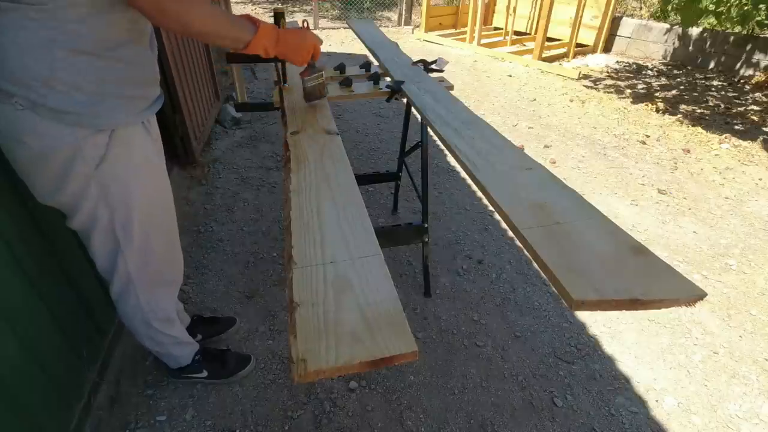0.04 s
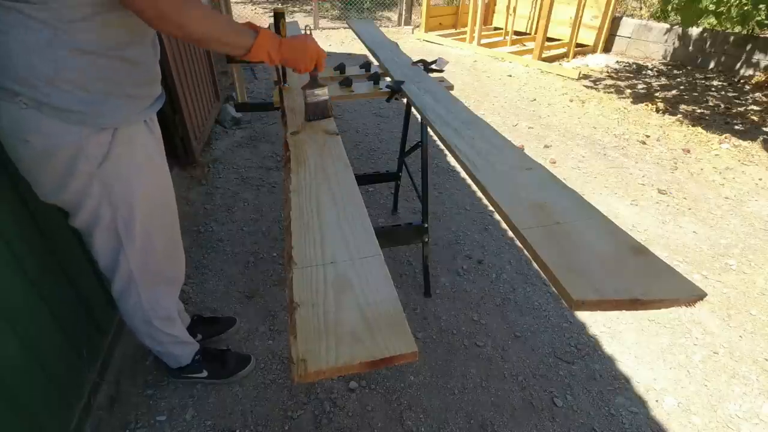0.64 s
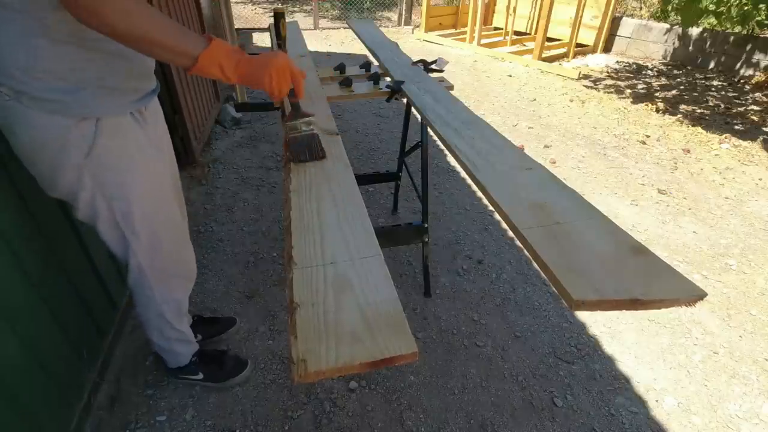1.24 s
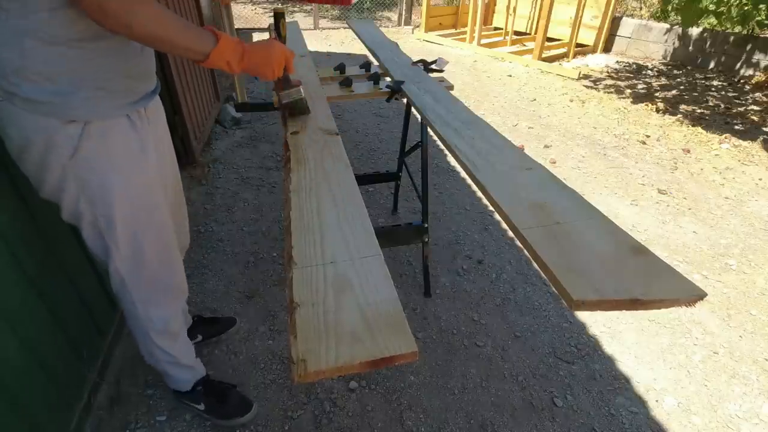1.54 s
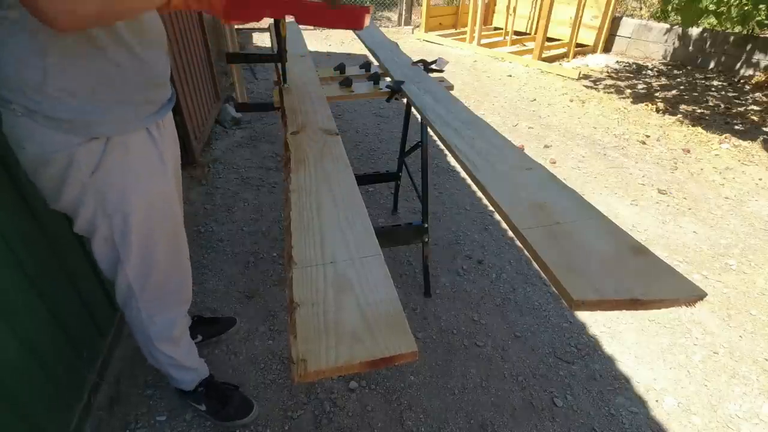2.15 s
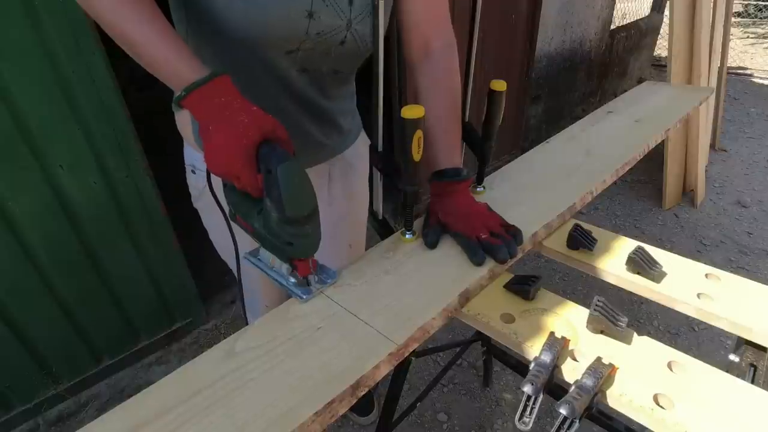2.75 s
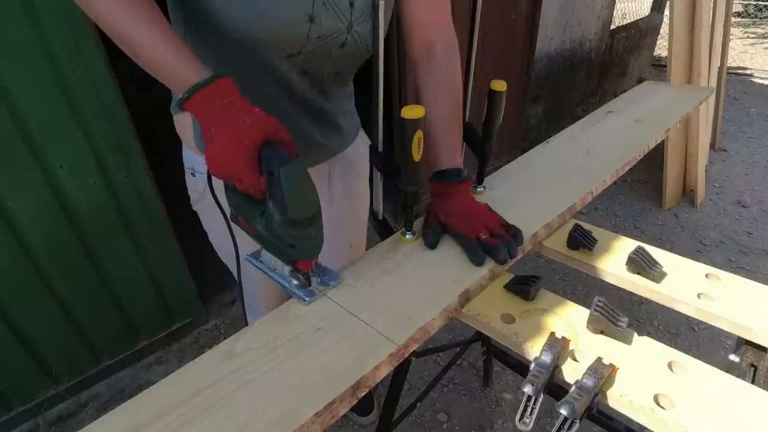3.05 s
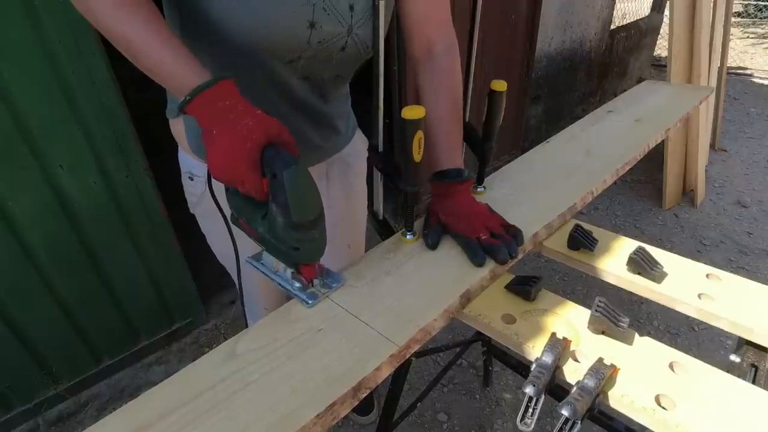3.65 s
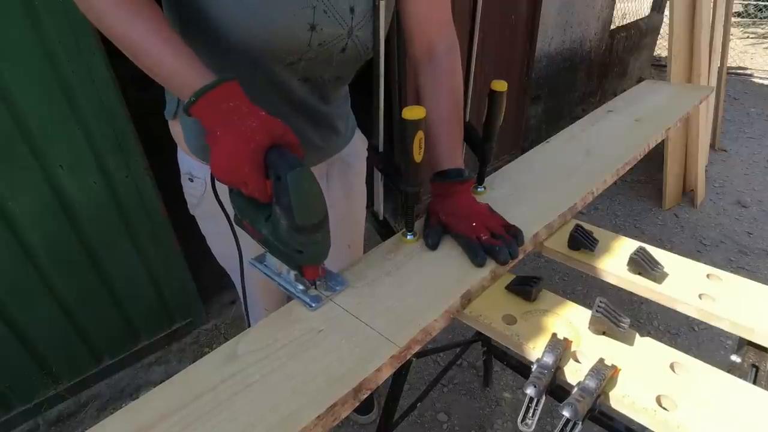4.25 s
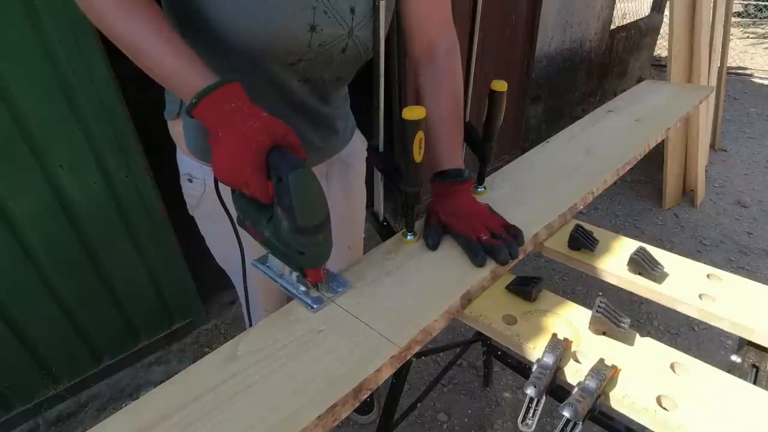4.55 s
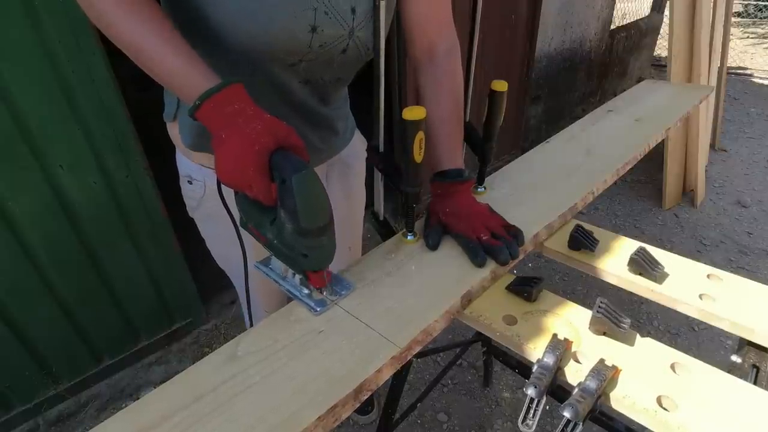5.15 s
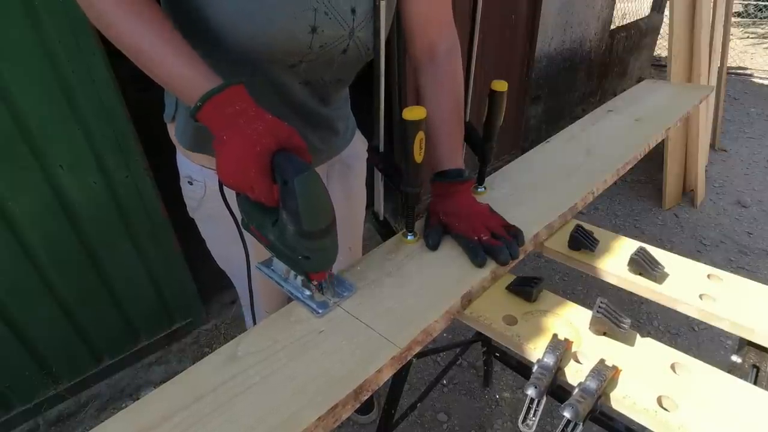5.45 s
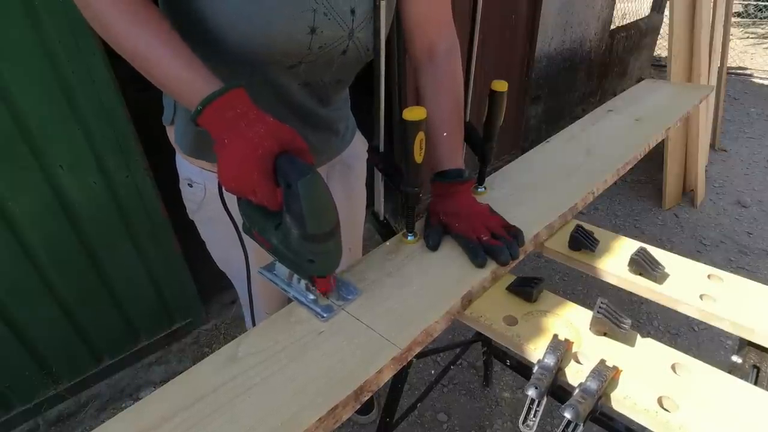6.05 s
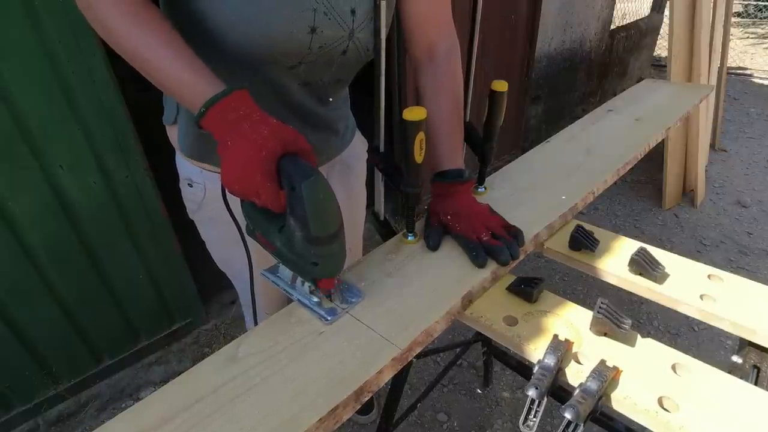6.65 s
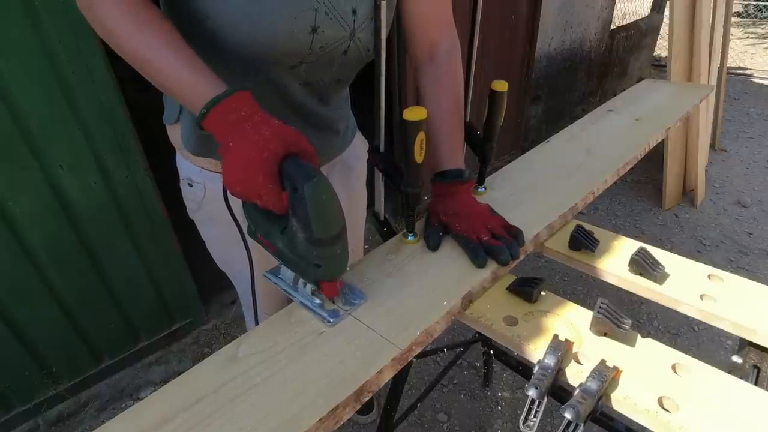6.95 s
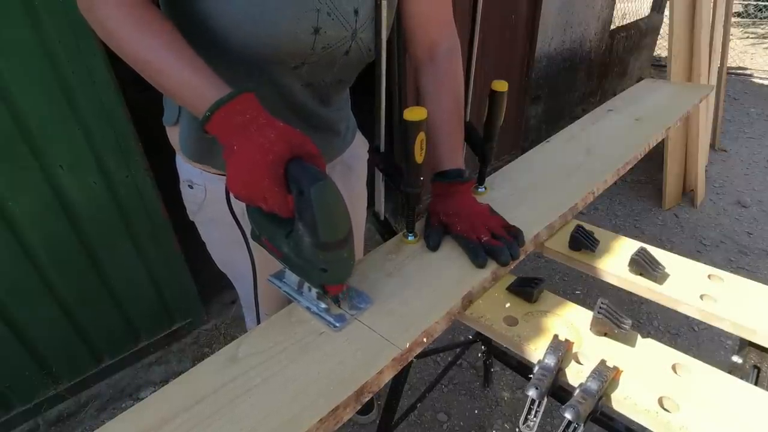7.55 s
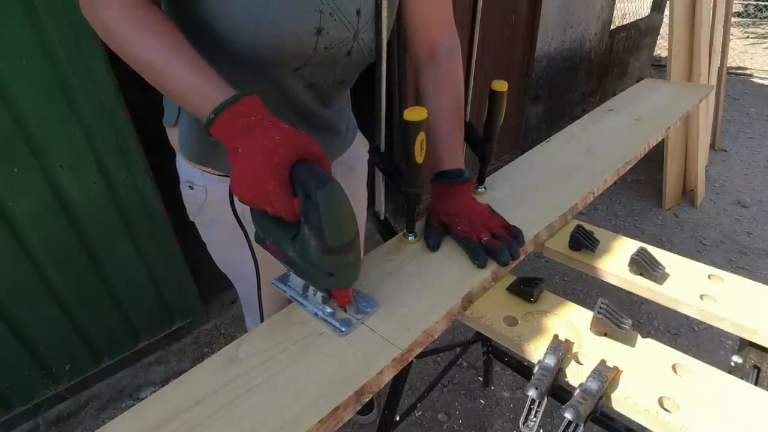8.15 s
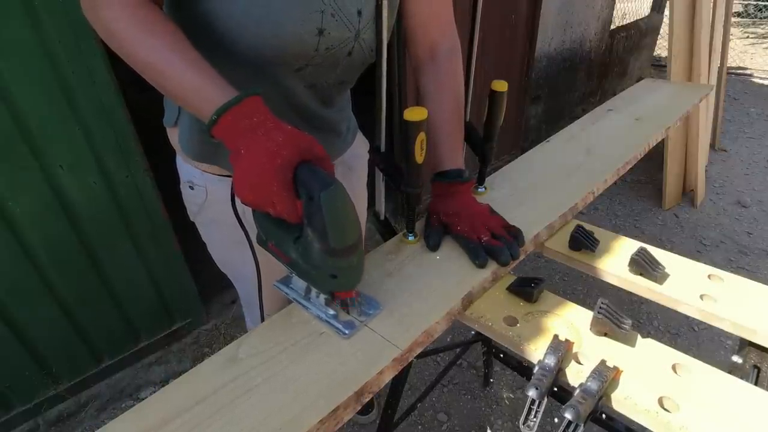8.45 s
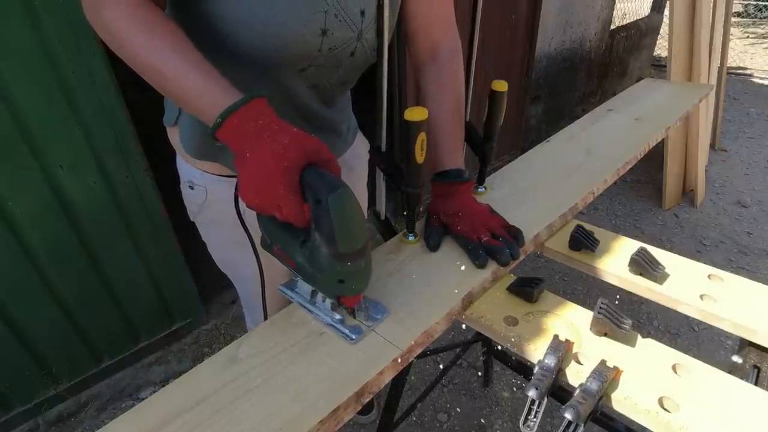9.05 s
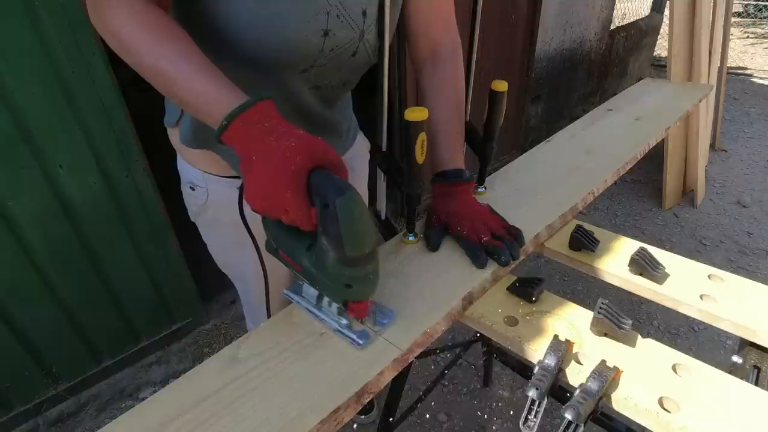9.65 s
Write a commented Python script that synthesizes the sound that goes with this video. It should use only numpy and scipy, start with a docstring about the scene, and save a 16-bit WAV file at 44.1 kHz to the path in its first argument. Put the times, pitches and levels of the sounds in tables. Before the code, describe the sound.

Soft bristle strokes and small knocks on a plank come first, over still outdoor air. Then an electric jigsaw starts near the microphone, whining up to a steady, clattering buzz that vibrates the board beneath it. After a few seconds the teeth enter the wood, rasping and growling in repeated pushes, with a few brief snags and a squeak, and the cutting carries on to the end.

```python
"""A corded jigsaw spins up and cuts a board on a workbench in a quiet yard.
Its plunger knocks at both ends of each stroke over gear whine and fan air. The shoe lands on the board,
which hums with the strokes; the blade is fed in until the teeth rasp and the board booms.
Before the saw starts, a brush rubs to and fro over a plank and bumps against it."""
import sys
import numpy as np
from scipy import signal
from scipy.fft import rfft, irfft
from scipy.io import wavfile
from scipy.ndimage import uniform_filter1d

SR = 44100
rng = np.random.default_rng(int(sys.argv[2]) if len(sys.argv) > 2 else 0)


def persist_wave(psi):
    """Save psi, clipped to +-1, as 16-bit WAV."""
    counts = np.round(np.clip(psi, -1, 1) * 32767).astype(np.int16)
    wavfile.write(sys.argv[1], SR, np.atleast_2d(counts).T)


N = 431738
TIME = np.arange(N) / SR
FREQ = np.fft.rfftfreq(N, 1 / SR)
MID_ONLY = np.array([[1], [0]])  # layers have two rows: mid, diffuse
START_S, LAND_S, BITE_S = 2.395, 3.13, 6.47  # crank starts, shoe lands, teeth bite


# Crank cruising speed: t/s, stroke rate/Hz
STROKE_RATE = [(3.4, 47.9), (4.57, 47.7), (5.04, 48.1), (6.05, 47.7), (6.28, 47.42), (6.75, 48.05),
               (7.95, 47.17), (8.31, 47.78), (8.47, 47.68), (8.79, 48.08), (8.97, 48.07), (9.26, 47.57),
               (9.4, 47.77), (9.79, 47.67)]
# Hand pushes, with two short blade jolts near 8.7 s and 9.0 s: start/s, end/s, surge/dB
SURGES = [(6.794, 7.196, 7.5), (7.172, 7.507, 10.5), (7.525, 7.977, 12.5), (8.081, 8.46, 11.5),
          (8.485, 8.96, 7), (8.676, 8.76, 6.5), (8.92, 9.29, 12), (8.986, 9.075, 4), (9.337, 9.587, 7),
          (9.681, 9.89, 11)]

def jigsaw(spin_from_s=2.356, spin_tau_s=0.148, slack_db=-6, switch_db=-20, graze=0.128):
    """One crank drives the whole saw; the hand feeds it into the board in pushes."""
    spin = 1 - np.exp(-np.maximum(TIME - spin_from_s, 0) / spin_tau_s)
    stroke_hz = curve(STROKE_RATE) * spin * (TIME > START_S)
    turns = 0.9 + np.cumsum(stroke_hz) / SR  # rests just short of a reversal, so starts with a knock
    depth = ramp(BITE_S, 2.96)
    feed = np.clip(0.76 * ramp(BITE_S, 0.41) + 0.24 * depth, graze, 1)
    surge_db = slack_db + sum(db * arch(start, end) ** 0.42 for start, end, db in SURGES)
    machine = plunger(turns, feed) + gears(turns, feed) + fan(turns) + shoe_and_blade(turns, feed)
    wood = board_hum(turns, feed, depth, surge_db) + board_boom(turns, feed, surge_db)
    wood = wood + teeth(turns, feed, surge_db) + snags()
    switch = amp(switch_db) * ramp(2.382, 0.0011)  # faint stir before the crank moves
    return (machine + wood) * np.maximum(switch, ramp(START_S, 0.0056))


# Knocks per stroke: phase/turns, free level/dB, landed level/dB
KNOCKS = [(.43, 4.5, 0), (.935, 3.5, 3.5), (.78, -14, -2), (.25, -7, -4.5)]
# Housing spectrum: f/Hz, level/dB
HOUSING_SPECTRUM = [(250, -33.5), (600, -15), (900, -5.5), (1150, -19.5), (1500, 3), (1900, 5),
                    (2600, -5.5), (3300, -11), (5000, -8.5), (6300, -25.5), (16000, -28.5)]

def plunger(turns, feed, free_db=-35.5, landed_db=-34, jitter_s=5e-5, chatter_s=0.0008):
    """The plunger takes up its play and knocks on the housing, never twice alike."""
    blows = np.zeros(N)
    for phase, db_free, db_landed in KNOCKS:
        times = np.interp(np.arange(int(turns[-1])) + phase, turns, TIME)
        late, size = rng.standard_normal((len(times), 2)).T
        at = np.clip((times + jitter_s * late) * SR, 0, N - 1).astype(int)
        blows[at] += amp(np.where(times < LAND_S, db_free, db_landed) + 2 * size)
    chatter = noise() * signal.lfilter([1], [1, -np.exp(-1 / (chatter_s * SR))], blows)
    knocks = unit(blows * MID_ONLY) + 0.45 * unit(chatter)
    knocks = colour(reflections(knocks) * (TIME > START_S), HOUSING_SPECTRUM)
    damping_db = feed + 6 * ramp(8.44, 0.51)  # the shoe seats fully
    return knocks * amp(np.where(TIME < LAND_S, free_db, landed_db) - damping_db)


# Gear mesh tones: f/stroke rate (rounded on use), light level/dB, loaded level/dB
MESH_TONES = [(54, -48, -48), (56, -81, -35.5), (58, -52, -39.5), (111.2, -45, -62), (166.3, -55, -45.5)]
# Gear rattle spectrum: f/Hz, level/dB
RATTLE_SPECTRUM = [(120, -19.5), (200, -21.5), (237, -10.5), (284, -16), (342, -5.5), (536, -5), (626, 2.5),
                   (763, 0), (1750, 0), (2710, -3), (2990, -0.5), (5260, -12), (5800, -18), (7540, -55),
                   (12800, -120)]

def gears(turns, feed, rattle_db=-31, spin_up_db=-34):
    """Gear teeth rattle hardest twice a stroke; their mesh whines, flaring as the motor spins up."""
    load = 1 + 0.5 * lobe(2 * turns, 0.81, 0.46)
    level_db = rattle_db + 1.22 * ramp(LAND_S, 0.098) + 0.6 * feed - 3 * (1 - ramp(START_S, 0.2))
    contacts = noise() + 0.5 * stroke_texture(turns) + 0.62 * grains(1800, 4.5)
    rattle = colour(contacts * load, RATTLE_SPECTRUM) * amp(level_db + 1.5 * drift(12))
    shaft = turns + 0.0017 * drift(30)
    whine = np.zeros(N)
    for multiple, db_light, db_loaded in MESH_TONES:
        tone_db = db_light + (db_loaded - db_light) * feed - 1 + 2 * drift(6.7)
        whine += amp(tone_db) * np.sin(2 * np.pi * round(multiple) * shaft)
    pull = np.exp(-((TIME - 2.55) / 0.08) ** 2) + 0.41 * arch(2.2, 2.64, 0.506)
    climb = pull * np.sin(2 * np.pi * 111 * shaft + 0.95 * drift(350))
    climb += 0.83 * arch(2.56, 2.77) * np.sin(2 * np.pi * 54 * shaft + drift(200))
    return rattle + (whine * ramp(3.3, 0.73) + np.sqrt(2) * amp(spin_up_db) * climb) * MID_ONLY


# Shoe and blade modes: f/Hz, nominal width/Hz, free level/dB, cutting level/dB
METAL_MODES = [(1193, 210, -67, -44), (1390, 140, -53, -48), (1630, 39, -61, -40.5), (1950, 200, -52, -61),
               (2160, 1100, -44, -56), (3160, 320, -42.5, -69), (3430, 230, -73, -44.5),
               (4556, 290, -48.5, -49), (5355, 160, -49.5, -61)]
# Passing resonances: start/s, end/s, f/Hz, nominal width/Hz, level/dB
METAL_SWELLS = [(2.385, 2.45, 3350, 500, -30.5), (3.13, 4.47, 3210, 150, -39), (4.45, 5.6, 3020, 60, -46),
                (4.92, 5.8, 1725, 66, -43), (4.1, 4.55, 1100, 150, -41), (3.3, 5.9, 1810, 180, -39.5),
                (6, 6.5, 1840, 220, -45), (5.2, 5.76, 1440, 89, -39.5), (6.55, 7.33, 1299, 120, -34),
                (7.5, 8.56, 1900, 140, -36.5), (6.87, 7.44, 3430, 350, -43), (7.88, 8.06, 1134, 110, -30),
                (8.3, 8.45, 1370, 140, -36), (9.68, 9.82, 1270, 160, -26)]

def shoe_and_blade(turns, feed, gain_db=-2):
    """The strokes excite narrow metal resonances; some sing out as the saw jerks and settles."""
    drive = (stroke_texture(turns) + 0.5 * noise()) * (0.54 + lobe(2 * turns, 0.85, 0.12))
    out = np.zeros((2, N))
    for hz, width_hz, db_free, db_cut in METAL_MODES:
        level = (1 - feed) * amp(db_free) + feed * amp(db_cut)
        out += resonance(drive, hz, width_hz) * level * amp(gain_db + 0.5 * drift(1.5))
    for start, end, hz, width_hz, db in METAL_SWELLS:
        out += resonance(drive, hz, width_hz) * amp(db + 3 * drift(14)) * arch(start, end)
    return out


# Board harmonics: f/stroke rate, resting level/dB, cutting level/dB
HUM_HARMONICS = [(2, -27, -24), (3, -3, -4), (4, -26, -20), (5, -11.5, -10), (6, -23, -18), (7, -5.5, -27),
                 (8, -8.5, -18), (9, -11, -18.5), (10, -4, -9.5), (12, -8.5, -35), (13, -4.5, -15),
                 (14, -2, -22), (15, -12, -5), (17, -6, -7.5), (18, -7.5, -11), (19, -0.5, -4),
                 (20, -15, -19), (21, -10, -22), (22, -5, -15), (23, -5, -7.5), (24, -6, -10),
                 (25, -3.5, -13), (26, -4.5, -9), (28, -8, -9), (29, -16, -12), (30, -3, -7)]
# Loose shoe buzzes: start/s, end/s, f/stroke rate, level/dB
SHOE_BUZZES = [(3.05, 3.555, 7, -39.5), (3.6, 4.91, 7, -38), (5.456, 6.65, 7, -45.5),
               (3.183, 3.398, 13, -36.5), (3.36, 4.06, 13, -30), (3.69, 4.75, 25, -34.5),
               (4.2, 4.55, 23, -36), (4.5, 6.1, 22, -37), (4.85, 5.65, 28, -37), (4.75, 6.05, 30, -39),
               (4.902, 5.8, 19, -37), (6.05, 6.305, 15, -33.5), (6.147, 6.953, 19, -33)]

def board_hum(turns, feed, depth, surge_db, resting_db=-40.5, cutting_db=-33, mains_hz=150):
    """The shoe shakes the board; the bass grows with depth and beats against the motor's mains hum."""
    uneven = (0.0285 + 0.0084 * feed) * drift(12)  # the biting blade makes the strokes uneven
    seating = 0.48 + 0.52 * ramp(LAND_S, 0.82)
    depth_db = 7 * depth
    out = amp(depth_db - 56) * np.sin(2 * np.pi * mains_hz * TIME + drift(2.7))
    for k, db_rest, db_cut in HUM_HARMONICS:
        boost_db = depth_db - 4 if k <= 5 else 0.23 * surge_db
        level = (1 - feed) * seating * amp(db_rest + resting_db)
        level += feed * amp(db_cut + cutting_db + boost_db)
        level *= amp(3 * drift(3) * np.sqrt(k / 20) + (0.87 + 1.1 * feed) * drift(9))
        for start, end, multiple, db in SHOE_BUZZES:
            if multiple == k:
                level = np.maximum(level, amp(db) * np.sqrt(arch(start, end, 0.4)))
        phase = 2 * np.pi * (k * turns + rng.random())
        out += level * np.sin(phase + k * (uneven + 0.0169 * feed * drift(13)))
    return np.sqrt(2) * out * ramp(LAND_S, 0.024) * MID_ONLY


def board_boom(turns, feed, surge_db, level_db=-28.2, start_hz=722, fall_hz=72, growl_hz=640):
    """Each upstroke snatches the board, which booms into the next stroke over a narrow growl."""
    centre_hz = start_hz - fall_hz * ramp(BITE_S, 2.3)  # the board softens as the cut deepens
    stroke_hz = curve(STROKE_RATE)
    wobble = 0.11 * drift(20)
    slaps = np.zeros(N)
    for k in range(13, 18):
        detune = (k * stroke_hz - centre_hz) / 62
        phase = 2 * np.pi * k * (turns - 0.95) + 0.6 * detune ** 2 + wobble
        slaps += np.exp(-detune ** 2) * np.cos(phase)
    level = feed * ramp(BITE_S, 0.092) * amp(level_db + 1.1 * surge_db + 0.5 * drift(20))
    growl = resonance(noise()[0], growl_hz, width_hz=36)
    return (unit(slaps) + 0.35 * growl) * level * MID_ONLY


# Board rasp spectrum: f/Hz, level/dB
RASP_SPECTRUM = [(80, -25.5), (300, -17), (470, -4), (550, -23), (640, -8), (720, 3), (800, -2.5),
                 (1100, -1), (1400, -3.5), (1650, -1.5), (2200, -24), (3500, -13), (6000, -47)]

def teeth(turns, feed, surge_db, level_db=-29.5):
    """The teeth tear fibres, hardest on the upstroke, and ring the board."""
    bite = 0.7 + lobe(turns, 0.89, 0.086) + 0.5 * lobe(turns, 0.8, 0.092)
    rasp = colour((0.626 * noise() + grains(1200, 2.07)) * bite, RASP_SPECTRUM)
    return rasp * np.sqrt(feed) * ramp(LAND_S, 0.097) * amp(level_db + 0.18 * surge_db)


# Blade snags: t/s, level/dB
SNAGS = [(8.352, -17), (8.684, -23), (9.018, -23)]

def snags(t60_s=0.057):
    """The blade snags and the shoe slaps down on the board."""
    level = sum(ramp(s, 0.0032) * amp(db - 60 * abs(TIME - s) / t60_s) for s, db in SNAGS)
    return colour(noise(), RASP_SPECTRUM) * level


# Vent hiss envelope: t/s, level/dB
VENT_LEVEL = [(2.42, -49.5), (2.56, -40), (3.6, -38), (6.24, -36.5), (9.02, -39), (9.76, -42.5)]
# Vent hiss spectrum: f/Hz, level/dB
VENT_SPECTRUM = [(300, -8), (1000, -6), (4500, 5.5), (5400, -9), (6000, -1), (7000, -0.5), (8000, 4),
                 (8900, 3.5), (9900, -0.5), (11500, -3), (13500, -1), (15000, 0), (16000, -4)]

def fan(turns, gain_db=2.5):
    """Cooling air hisses from the vents, pulsing slightly twice a stroke."""
    air = noise() * (1 + 0.102 * lobe(2 * turns, 0.051, 0.32))
    return colour(air, VENT_SPECTRUM) * amp(curve(VENT_LEVEL) + gain_db + 0.96 * drift(40))


# Brush passes: start/s, end/s, rub level/dB, hiss level/dB, peak position/fraction
BRUSH_PASSES = [(-.13, 0.19, -55.5, -55, 0.55), (0.256, .553, -48, -47.5, 0.68),
                (0.667, 0.961, -53.5, -53.5, 0.49), (1.023, 1.314, -45.5, -45, 0.5),
                (1.397, 1.653, -49.5, -54.5, 0.43), (1.695, 2.044, -44, -47.5, 0.6)]
# Bristle spectrum: f/Hz, level/dB
BRISTLE_SPECTRUM = [(82, -58), (140, -18.5), (196, -12.5), (300, -20.5), (451, -10), (740, -9.5), (930, -5),
                    (1540, 0), (2600, -2.5), (3760, -2), (5480, -12.5), (7000, -14.5), (8500, -11),
                    (11000, -18), (14800, -14.5), (16000, -32)]

def brush(split_hz=2700, body_hz=800, firm_db=-46):
    """Bristles scuff on landing, then flick over the grain: the plank gives the rub, the tips hiss."""
    rub_power, hiss_power = np.zeros((2, N))
    for start, end, db_rub, db_hiss, peak in BRUSH_PASSES:
        speed = arch(start, end, peak)
        rub_power += (amp(db_rub) * speed) ** 2
        hiss_power += (amp(db_hiss) * speed) ** 2
    for s, _, db, _ in PLANK_CONTACTS:
        scuff = amp(db) * ramp(s, 0.0113) * np.exp(-abs(TIME - s) / 0.092)
        rub_power += scuff ** 2
        hiss_power += (scuff * amp(-20)) ** 2
    rub, hiss = np.sqrt(rub_power), np.sqrt(hiss_power)
    flicks = colour(noise() + 0.42 * grains(1500, 1.6), BRISTLE_SPECTRUM) * amp(0.94 * drift(45))
    low = lowpass(flicks, split_hz)
    wood = plank_ring(low)
    body = lowpass(wood, body_hz)
    firmness = (rub / amp(firm_db)) ** 0.84  # only a firm stroke wakes the low body
    return (wood - body + body * firmness) * rub + unit(flicks - low) * hiss


def plank_ring(x, t60_s=0.06, wet=0.5):
    """Dense plank modes ring after each flick; their mix shifts as the brush travels."""
    t = TIME[:SR // 8]
    tails = rng.standard_normal((2, 1, len(t))) * amp(-60 * t / t60_s)
    near, far = [signal.oaconvolve(x, tail / np.linalg.norm(tail), axes=1)[:, :N] for tail in tails]
    starts = [row[0] for row in BRUSH_PASSES]
    travel = np.pi / 2 * np.interp(TIME, starts, np.arange(len(starts)))
    return unit(x + wet * (near * np.cos(travel) + far * np.sin(travel)))


# Contacts with the plank: t/s, bump level/dB, scuff level/dB, contact decay/s
PLANK_CONTACTS = [(.21, -57.5, -56, .025), (.632, -53.5, -47, .027), (.992, -66, -57, .025),
                  (1.353, -49.5, -53.5, 0.044), (1.754, -36.5, -46.5, 0.015), (2.06, -49, -81, 0.079),
                  (2.146, -43.5, -72, 0.0243), (2.207, -47.5, -77, .004), (2.236, -44.5, -80.5, 0.0125)]
# Plank modes: f/Hz, level/dB, t60/s
PLANK_MODES = [(184, -25, 0.07), (790, 6, 0.05), (384, 5.5, 0.026), (560, 2, 0.098), (694, 11, 0.039),
               (945, 3, 0.024), (1240, 2.5, 0.027), (1880, -10, 0.025)]

def bumps(gain_db=-3):
    """Short scuffing contacts of brush or hand ring the plank."""
    t = TIME[:SR // 4]
    modes = sum(amp(db - 60 * t / t60_s) * np.sin(2 * np.pi * hz * t) for hz, db, t60_s in PLANK_MODES)
    out = np.zeros((2, N))
    for s, db, _, contact_s in PLANK_CONTACTS:
        force = rng.standard_normal((2, len(t))) * np.exp(-t / contact_s)
        bump = signal.fftconvolve(force, modes[None], axes=1)
        at = round(s * SR)
        out[:, at:at + bump.shape[1]] += amp(db + gain_db) * bump / abs(bump).max()
    return out


# Wood groans and squeaks: t/s, length/s, f/Hz, level/dB
SQUEAKS = [(1.087, 0.13, 200, -59.5), (1.22, 0.118, 560, -60), (8.745, 0.036, 1630, -22.5)]

def squeaks(waver_rad=0.78):
    """Wood sticks and slips briefly at one pitch."""
    waver = waver_rad * drift(50)
    tones = sum(amp(db) * arch(s, s + length_s) * np.sin(2 * np.pi * hz * TIME + waver)
                for s, length_s, hz, db in SQUEAKS)
    return np.sqrt(2) * tones * MID_ONLY


# Outdoor air spectrum: f/Hz, level/dB
YARD_SPECTRUM = [(25, -24), (80, 8.5), (130, -22), (220, -9), (700, -18.5), (1500, -21), (5000, -32.5),
                 (12000, -61.5)]

def yard(air_db=-66.5, rumble_db=-68, drone_db=-63, drone_hz=70.5):
    """Quiet outdoor air, a wandering rumble and a faint low drone that swells and fades."""
    rumble_level = amp(rumble_db + 2 * drift(2))
    rumble = colour(noise(), [(20, -9), (45, 9), (68, 5), (90, -17), (150, -6), (500, -70)])
    drone = amp(drone_db) * arch(-0.2, 1.1, 0.506) * np.sqrt(2) * np.sin(2 * np.pi * drone_hz * TIME)
    return colour(noise(), YARD_SPECTRUM) * amp(air_db) + rumble * rumble_level + drone * MID_ONLY


def reflections(x, t60_s=0.14, wet_db=-4, smooth_hz=90):
    """Adds a dense dying tail, flattened to favour no pitch."""
    t = TIME[:SR // 2]
    tail = rng.standard_normal((2, len(t))) * amp(-60 * t / t60_s)
    tail *= amp(wet_db) / np.linalg.norm(tail[0])
    response = 1 + rfft(tail, N)
    response /= np.sqrt(uniform_filter1d(abs(response) ** 2, round(smooth_hz * N / SR), axis=1))
    return irfft(rfft(x) * response, N)


# Base stereo width: f/Hz, side re mid/dB
STEREO_WIDTH = [(25, -3), (60, -6), (110, -18), (200, -35), (380, -32.5), (700, -16), (2380, -7),
                (4400, -2.5), (8120, 0.5), (15000, 2)]
# Part of the side signal due to the left leading: f/Hz, weight/fraction
LEFT_LEAD = [(100, 0), (1600, 0.7), (2800, 0.87), (6300, 0), (9000, 0.3), (10200, .08)]

def stereo(layers, low_width_db, treble_width_db):
    """Mid and diffuse rows to left and right: the left leads in phase and reflections differ."""
    mid, diffuse = layers
    lead = np.interp(FREQ, *np.transpose(LEFT_LEAD))
    widening = [(80, 0), (200, low_width_db), (900, 0), (6000, 0), (9000, treble_width_db)]
    width = gain_at(STEREO_WIDTH, FREQ) * gain_at(widening, FREQ)
    side = irfft(width * (1j * lead * rfft(mid) + np.sqrt(1 - lead ** 2) * rfft(diffuse)), N)
    return np.array([mid + side, mid - side])


def amp(db):
    """Decibels to gain."""
    return 10 ** (np.asarray(db) / 20)


def unit(x):
    """Scales to rms 1."""
    return x / np.sqrt(np.mean(x ** 2) + 1e-20)


def curve(points):
    """Line through (t/s, value) points."""
    return np.interp(TIME, *np.transpose(points))


def ramp(start_s, length_s):
    """Linear rise from 0 to 1."""
    return np.clip((TIME - start_s) / length_s, 0, 1)


def arch(start_s, end_s, peak=0.494):
    """Half sine with its top at the fraction peak."""
    progress = ramp(start_s, end_s - start_s)
    return np.sin(np.pi * np.interp(progress, [0, peak, 1], [0, 0.5, 1])).clip(0)


def lobe(turns, phase, width):
    """One smooth bump per turn."""
    return np.exp((np.cos(2 * np.pi * (turns - phase)) - 1) / (2 * np.pi * width) ** 2)


def noise():
    """Two independent white noises."""
    return rng.standard_normal((2, N))


def drift(hz):
    """Random wander up to about hz, rms 1."""
    knots = rng.standard_normal(2 ** 14)
    return unit(np.interp(2 * hz * TIME, np.arange(len(knots)), knots))


def grains(per_s, spread_db):
    """Random clicks of uneven size, rms 1."""
    clicks = noise() * (rng.random((2, N)) < per_s / SR)
    return unit(clicks * amp(spread_db * np.minimum(rng.exponential(1, (2, N)), 4)))


def stroke_texture(turns, harmonics=200, size=4096):
    """A rough contact that recurs every stroke and slowly changes."""
    cycles = irfft(np.exp(2j * np.pi * rng.random((2, harmonics))), size)
    first, second = cycles[:, (turns % 1 * size).astype(int)]
    blend = 1.24 * drift(2)
    return unit(first * np.cos(blend) + second * np.sin(blend)) * MID_ONLY


def gain_at(spectrum, hz):
    """Gain of (f/Hz, level/dB) points, interpolated over log frequency."""
    f, db = np.transpose(spectrum)
    return amp(np.interp(np.log(hz + 1), np.log(f + 1), db))


def colour(x, spectrum):
    """Minimum-phase filter; output rms 1."""
    log_gain = np.log(gain_at(spectrum, abs(np.fft.fftfreq(4096, 1 / SR))))
    taps = np.fft.ifft(np.exp(np.conj(signal.hilbert(log_gain)))).real
    return unit(signal.oaconvolve(x, taps[None], axes=1)[:, :N])


def resonance(x, hz, width_hz):
    """Steep-skirted peak of nominal width; output rms 1."""
    b, a = signal.iirpeak(hz, hz / (1.13 * width_hz), fs=SR)
    return unit(signal.lfilter(b, a, signal.lfilter(b, a, x)))


def lowpass(x, hz):
    """Zero-phase low-pass."""
    return irfft(rfft(x) / (1 + (FREQ / hz) ** 6), N)


def scene():
    """Saw and yard, with the brush wider in the low range."""
    brushing = stereo(brush() + bumps() + squeaks(), low_width_db=27, treble_width_db=1)
    return stereo(jigsaw() + yard(), low_width_db=10.5, treble_width_db=0.5) + brushing


def record(dry, edge_hz=15900):
    """Steep band limit."""
    taps = signal.firwin(511, edge_hz, window=("kaiser", 9), fs=SR)
    return signal.oaconvolve(dry, taps[None], "same")


dry = scene()
out = record(dry)
persist_wave(out)
```